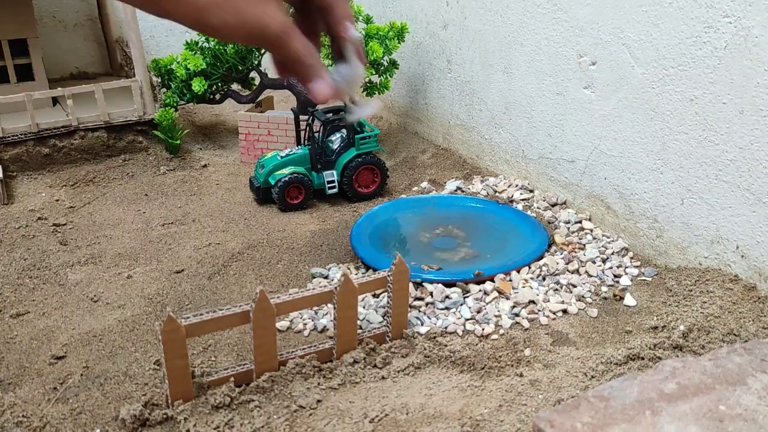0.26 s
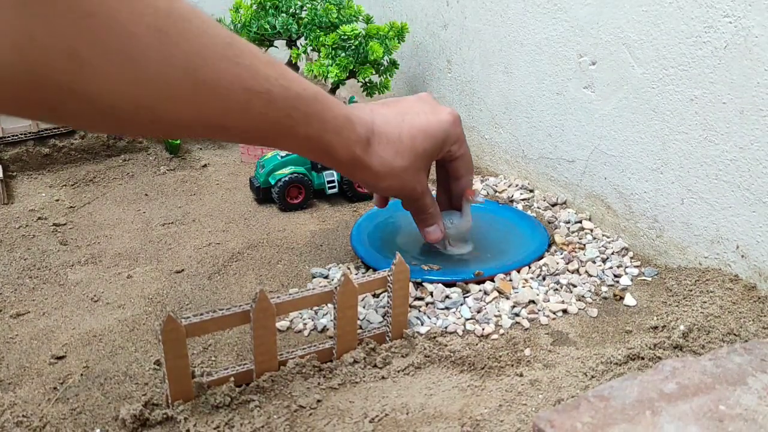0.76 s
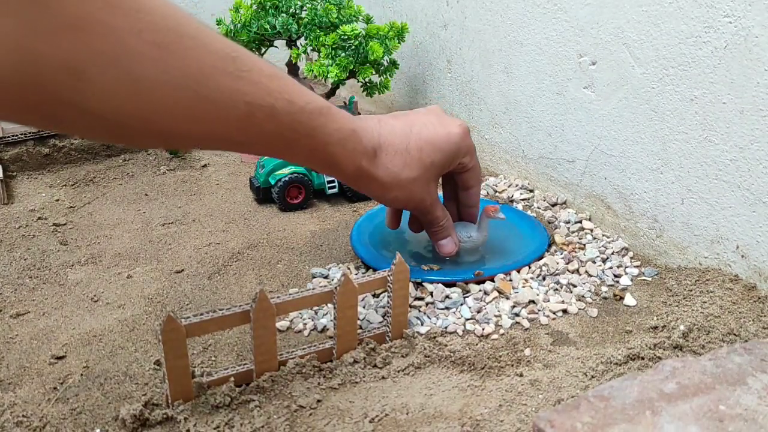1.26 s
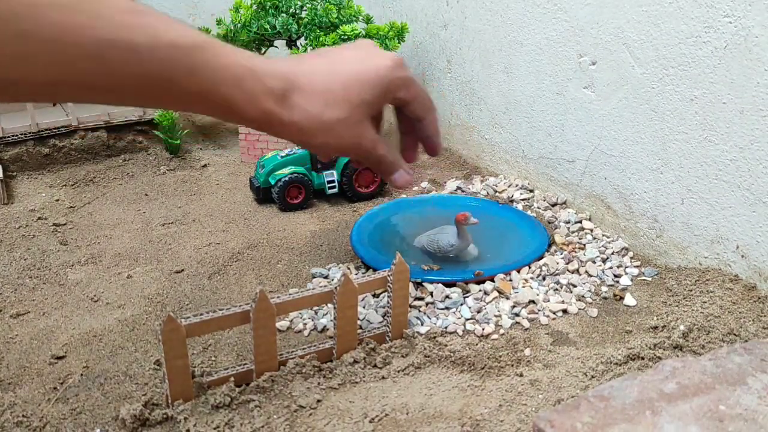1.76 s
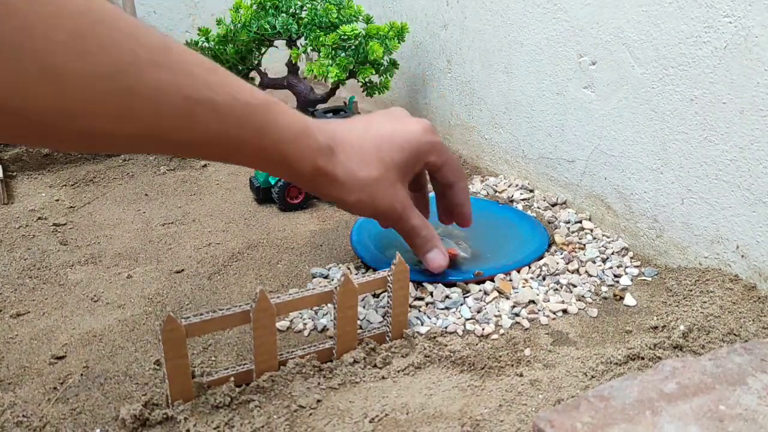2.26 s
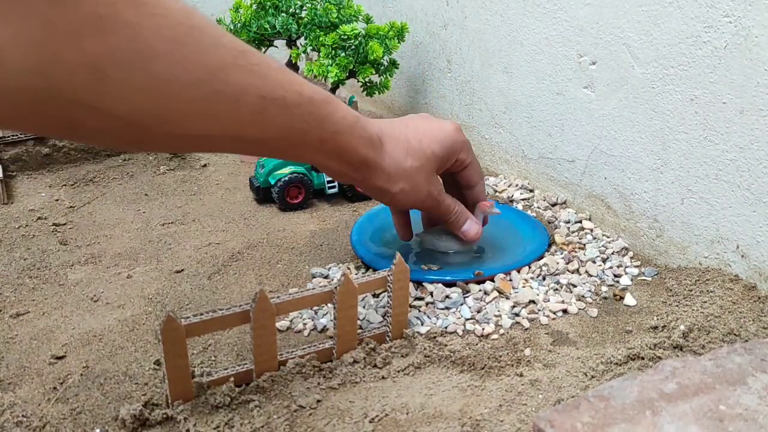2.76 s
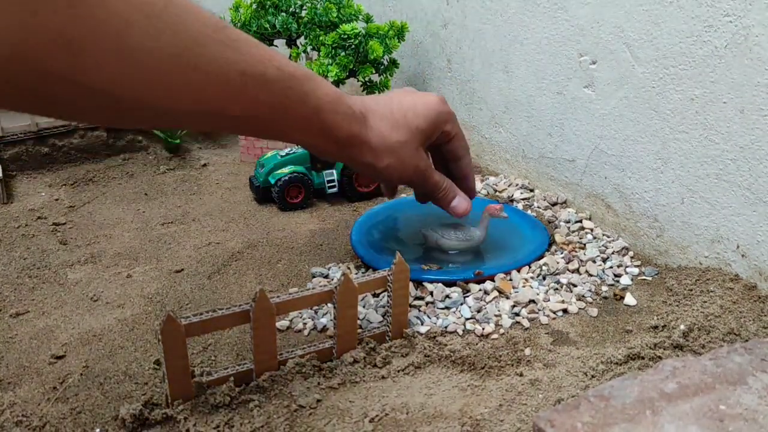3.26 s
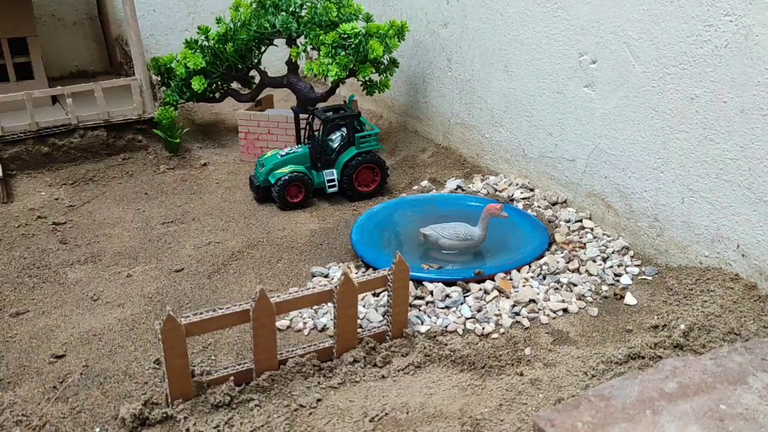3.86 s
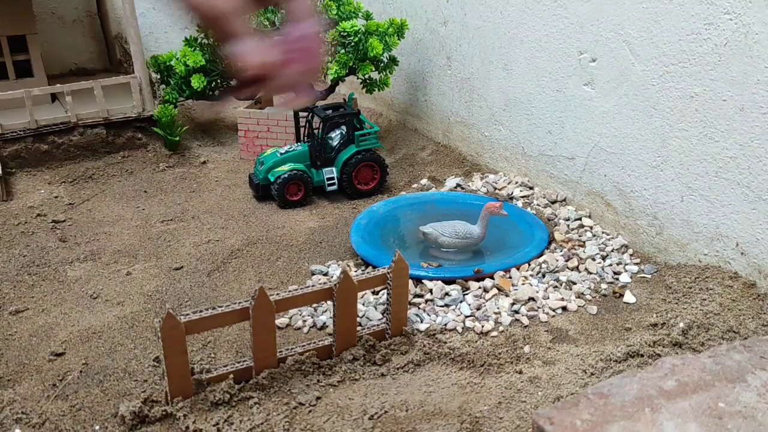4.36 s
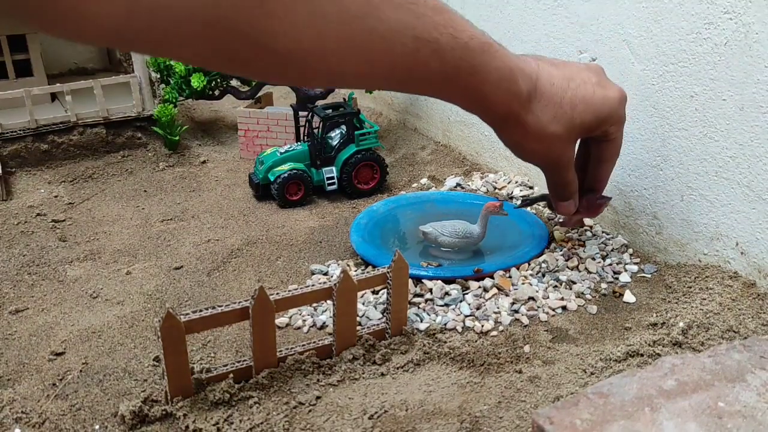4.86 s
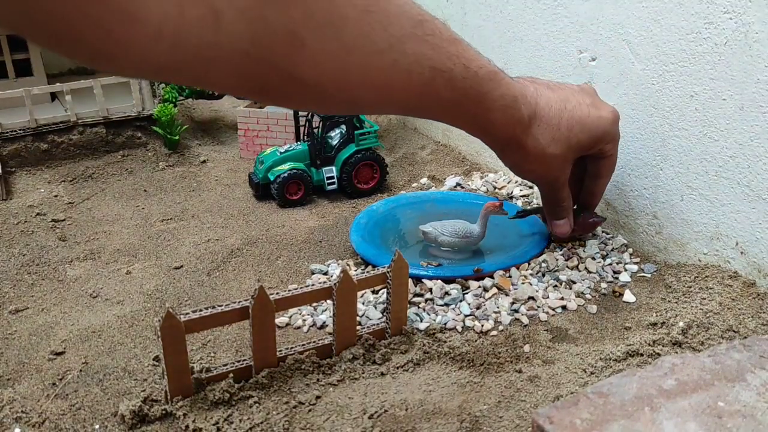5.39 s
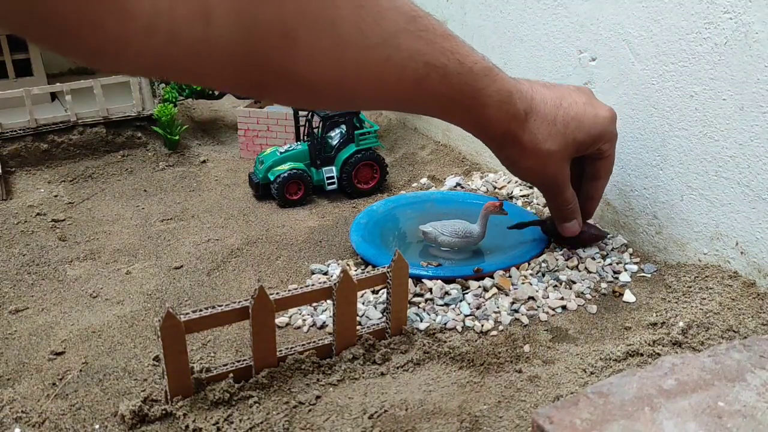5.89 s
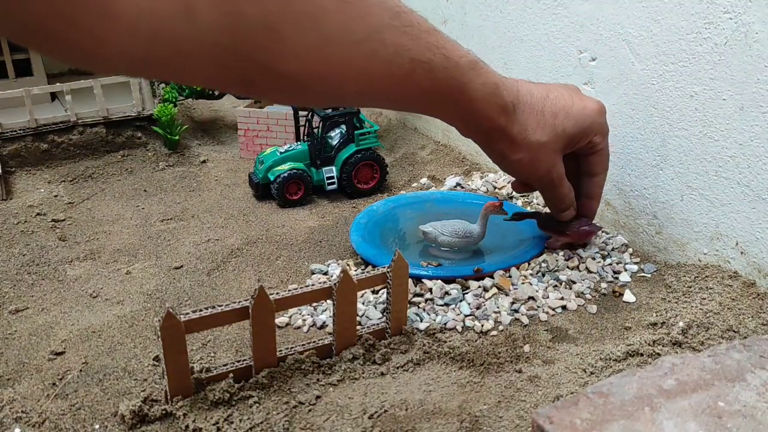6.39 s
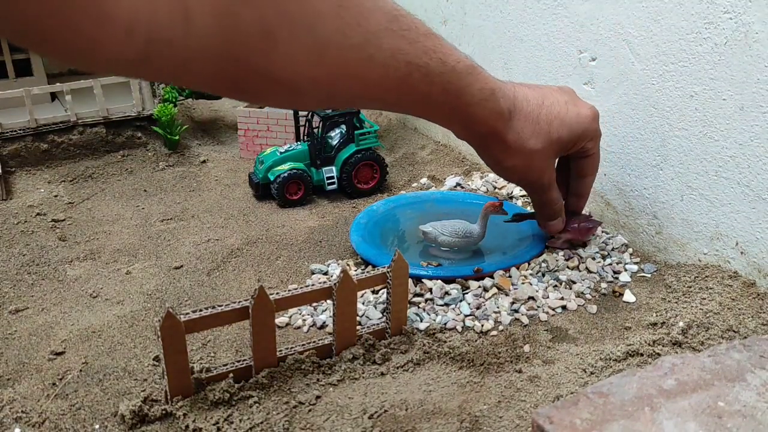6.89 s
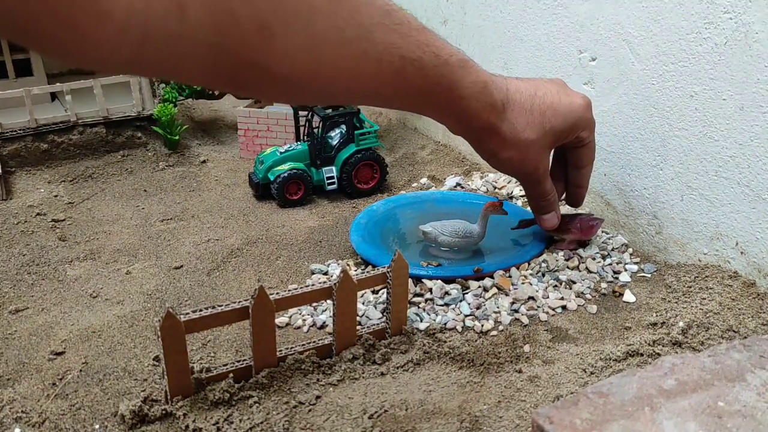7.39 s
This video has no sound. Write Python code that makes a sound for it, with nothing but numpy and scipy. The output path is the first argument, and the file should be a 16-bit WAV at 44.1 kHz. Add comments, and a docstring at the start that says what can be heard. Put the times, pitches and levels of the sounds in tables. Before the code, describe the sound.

Several small birds bicker outdoors in a walled yard. Hoarse, buzzing screeches that sink in pitch mix with lower churrs, brief clean whistles, warbling rasps and a few piercing trills. Calls overlap in clusters with short gaps, some close, others fainter and bounced off the walls. A steady soft hiss lies beneath, with tiny ticks and dull bass bumps. Stereo microphone in the open, a little away from the birds.

```python
"""A walled yard where small birds squabble: hoarse sinking screeches, wide warbling rasps, low churrs, shrill trills.
Each call is a frequency-modulated whistle with band noise for hoarseness and a low voice rattling under it.
Clean whistles and peeps are gliding sines; so are thin squeaks, and ticks are decaying treble noise.
Sparse echoes throw the calls back off the walls. Shaped noise makes a steady outdoor hiss,
narrow bands a faint hum, and short bass bursts a few soft thumps."""
import sys
import numpy as np
from scipy import signal
from scipy.fft import rfft, irfft
from scipy.io import wavfile
from scipy.ndimage import uniform_filter1d, map_coordinates

SR = 44100
rng = np.random.default_rng(int(sys.argv[2]) if len(sys.argv) > 2 else 0)


def transcribe(signal):
    """Save signal, clipped to [-1, 1], as a 16-bit WAV file at the path in sys.argv[1]."""
    frames = np.atleast_2d(signal).T
    limited = np.clip(frames, -1, 1)
    pcm = np.round(limited * 32767).astype(np.int16)
    wavfile.write(sys.argv[1], SR, pcm)


N = 336924

# low voice of trills and rasps: flick height (share of its pitch), flicks per beat, level between flicks (dB)
TWIN_RATTLE = dict(flick_share=.2, flicks=2, rest_db=1)


def gain_of(db):
    """Decibels to gain."""
    return 10 ** (np.asarray(db) / 20)


def evened(x):
    """Scales to rms 1."""
    return x / np.sqrt(np.mean(x ** 2) + 1e-20)


def read(points, hz):
    """Interpolates a (Hz, value) table on a log-frequency axis."""
    f, value = np.transpose(points)
    return np.interp(np.log(hz + 1), np.log(f + 1), value)


def add(mix, start_s, sound):
    """Adds a sound into the mix at start_s, cut at the end of the mix."""
    part = mix[max(round(start_s * SR), 0):][:len(sound)]
    part += sound[:len(part)]


def noise(size, spectrum, tilt_db):
    """Noise of rms 1 with a (Hz, dB) spectrum, tilted by tilt_db an octave above 3 kHz."""
    hz = np.fft.rfftfreq(size, 1 / SR)
    shape_db = read(spectrum, hz) + tilt_db * np.log2(np.maximum(hz / 3000, 1))
    return evened(irfft(rfft(rng.standard_normal(size)) * gain_of(shape_db), size))


def band(size, hz, width_hz):
    """Noise of rms 1 in one bell-shaped band; at 0 Hz, a slow random drift."""
    bell = np.exp(-.5 * ((np.fft.rfftfreq(size, 1 / SR) - hz) / width_hz) ** 2)
    return evened(irfft(rfft(rng.standard_normal(size)) * bell, size))


def glide(hz, envelope):
    """A pure tone along a pitch curve."""
    return np.sqrt(2) * envelope * np.sin(2 * np.pi * np.cumsum(hz) / SR)


def air(level_db=-38.5, patchy_db=1.45):
    """Distant outdoor hiss, partly alike left and right and drifting a little, with a wavering low hum."""
    # Hiss spectrum. Each row: frequency in Hz, relative level in dB per Hz.
    hiss_spectrum = [(15, -64), (25, -54), (48, -20.5), (113, -23.5), (136, -25), (322, -16.5), (359, -17),
                     (399, -13.5), (631, -7.5), (782, -5), (895, -1.5), (1750, -6.5), (3530, -5.5),
                     (8130, -17), (15500, -28)]
    # Stereo likeness of the hiss. Each row: frequency in Hz, left-right correlation.
    hiss_likeness = [(60, 0.96), (130, 0.93), (290, 0.78), (640, 0.7), (1410, 0.64), (3100, 0.19),
                     (6820, -0.099), (15000, 0.2)]
    # Stereo lean of the hiss. Each row: frequency in Hz, left over right in dB.
    hiss_balance = [(60, -9), (110, -3), (200, -6), (380, -2), (700, -3), (1290, -1.0), (2380, -0.5),
                    (4400, 0.5), (8120, 0.5), (15000, -1.5)]
    # Hum bands. Each row: frequency in Hz, starting level in dB before the stereo lean, swell in dB per second.
    hum_bands = [(55.5, -80, 0.5), (110.73, -72.5, 0), (232.6, -79.5, 1.5)]
    frames, hz = N // 512 + 5, np.fft.rfftfreq(2048, 1 / SR)
    a, b, c, d, patches = rng.standard_normal((5, frames, len(hz)))
    patches = uniform_filter1d(uniform_filter1d(patches, size=10, axis=0), size=16, axis=1)
    patches = evened(patches)
    same = read(hiss_likeness, hz)
    left = a + 1j * b
    right = same * left + np.sqrt(1 - same ** 2) * (c + 1j * d)
    lean_db = np.array([.5, -.5])[:, None, None] * read(hiss_balance, hz)
    frame_db = read(hiss_spectrum, hz) + lean_db + patchy_db * patches
    z = np.array([left, right]) * gain_of(frame_db)
    hiss = evened(signal.istft(z.transpose(0, 2, 1), nperseg=2048, noverlap=1536)[1][:, :N])
    t = np.arange(N) / SR
    hum = sum(gain_of(db + swell * t) * band(N, f, 2.7) for f, db, swell in hum_bands)
    return gain_of(level_db) * hiss + hum * gain_of([[1], [-2]])


def whistles(opening_s=.022, direct_db=-7.5, wet_db=-5):
    """Pure tones: two-part whistles, each bent a little differently, and level peeps; direct and reflected."""
    # High arch dropping onto a sinking note, a very short gap, then a lower note that climbs to a flick and falls.
    # Each row: time from the start in seconds, pitch in Hz, relative level in dB.
    tune = [(0, 4250, -8), (.007, 5150, -2), (.016, 5650, -3), (.023, 4450, -1), (.032, 4100, 0),
            (.05, 3850, -7), (.064, 3500, -20), (.075, 3700, -3), (.086, 4250, 5), (.09, 4600, 0),
            (.095, 3750, -3), (.108, 3400, -6)]
    # Two-part whistles. Each row: start in seconds, relative level in dB, extra level of the opening arch in dB.
    whistle_events = [(0.082, -30, -4.5), (.868, -33, 2), (3.951, -29, -13), (6.509, -32.5, 1.5),
                      (7.347, -30, 1)]
    # Peeps. Each row: start in seconds, length in seconds, pitch in Hz, relative level in dB.
    peep_events = [(1.442, 0.02, 4250, -31), (1.923, 0.041, 3795, -35), (3.063, 0.22, 4670, -43),
                   (3.148, 0.016, 3235, -36), (3.972, .025, 3350, -37), (4.098, 0.035, 3410, -33.5),
                   (4.231, .042, 3430, -38), (5.775, 0.037, 4178, -36)]
    out = np.zeros(N)
    at_s, tune_hz, tune_db = np.transpose(tune)
    t = np.arange(0, at_s[-1], 1 / SR)
    size = len(t)
    for start_s, db, opening_db in whistle_events:
        bend = 1 + .008 * band(size, 0, 320) + .012 * band(size, 0, 25)
        hz = np.interp(t, at_s, tune_hz) * bend
        opening = np.exp(-(t / opening_s) ** 6)
        swell_db = np.interp(t, at_s, tune_db) + opening_db * opening + 2.5 * band(size, 0, 110)
        add(out, start_s, glide(hz, gain_of(db + swell_db) * signal.windows.tukey(size, .08)))
    for start_s, length_s, hz, db in peep_events:
        size = int(length_s * SR)
        wavering_hz = hz * (1 + .0044 * band(size, 0, 120))
        add(out, start_s, glide(wavering_hz, gain_of(db) * signal.windows.tukey(size, .7)))
    return out * gain_of([[direct_db], [wet_db]])


def squeaks(length_s=.015, start_hz=13820, fall_share=.13, level_db=-46.5):
    """Very thin falling sine glides, all alike, high in the treble."""
    # Start of each squeak in seconds.
    squeak_starts = [.134, .655, .712, .835, .952]
    out = np.zeros(N)
    age = np.linspace(0, 1, int(length_s * SR))
    for start_s in squeak_starts:
        add(out, start_s, glide(start_hz * (1 - fall_share * age), gain_of(level_db) * np.sin(np.pi * age)))
    return out


def rattle(turns, rest_hz, flick_share, flicks, rest_db, flick_width_beats=.25):
    """The low voice of the syrinx: unsteady at rest, it flicks up to a cleaner note once or twice a beat."""
    cycles = flicks * turns + (flicks - 1) / 2
    off_flick = abs((cycles + .5) % 1 - .5) / (flicks * flick_width_beats)
    flick = np.cos(np.pi / 2 * np.minimum(off_flick, 1)) ** 2
    size = len(turns)
    waver = .048 * (1 - .85 * flick) * band(size, 0, 220) + .02 * band(size, 0, 15)
    return evened(glide(rest_hz * (1 + flick_share * flick + waver), gain_of(rest_db * (1 - flick))))


def call(row, low_voice, dip, half_dip, follow, beat_db, offbeat_db, edge, rasp_rad, rasp_hz, rise_db, fade_db,
         tilt_db, waver_share, fade_power=3.0, onset_sag=.12, taper=.12):
    """A buzzing whistle that arches and sinks, swinging on and between beats, over a rattling low voice.

    dip, half_dip: pitch drop on and between beats (shares; negative lifts); edge: steepness of the drop.
    follow: how far the beat note follows the sinking pitch (share).
    """
    # Hoarse part of the voice. Each row: frequency in Hz, relative level in dB per Hz.
    throat_spectrum = [(1500, -34), (1950, -25), (2400, 2), (3000, -6.5), (3600, -0.5), (4500, 2),
                       (5250, 0), (5850, -6), (6600, -4.5), (7600, -12.5), (9500, -12), (11500, -12),
                       (13000, -27.5), (15000, -61)]
    beat_hz, arch_s = 49.34, .08  # arch_s: start to highest pitch, at most half the call
    overtone_db, overtone_hz = -13, 6200  # level of the octave above a note of overtone_hz
    low_follow, throat_follow = .35, .35  # powers of the whistle's pitch ratio
    length_s, level_db, crest, top_hz, final_hz, hoarse_db, low_hz, low_db = row
    size = int(length_s * SR)
    age = np.linspace(0, 1, size)

    turns = np.cumsum(beat_hz * (1 + .02 * band(size, 0, 25))) / SR
    beat = np.exp(-(abs((turns + .5) % 1 - .5) / .125) ** edge)
    offbeat = np.exp(-(abs(turns % 1 - .5) / .07) ** edge)

    arch = min(arch_s / length_s, .5)
    rising = np.maximum(1 - age / arch, 0)
    sinking = np.maximum(age - arch, 0) / (1 - arch)
    contour = top_hz * (1 - onset_sag * rising ** 2) + (final_hz - top_hz) * sinking ** 1.1
    pitch_ratio = contour / top_hz
    beat_note = top_hz * (1 - dip) + follow * (contour - top_hz)
    strain = gain_of(-7 * sinking)  # the voice relaxes as the pitch sinks
    waver = waver_share * np.sqrt(strain) * band(size, 0, 170)
    pitch = (contour + (beat_note - contour) * beat) * (1 - half_dip * offbeat + waver)

    # a second, irregular vibration shakes the tone between the beats and throws sidebands
    shake = rasp_rad * strain * (1 - beat) * band(size, rasp_hz, 180)
    phase = 2 * np.pi * np.cumsum(pitch) / SR + shake
    overtone = gain_of(overtone_db) * (pitch / overtone_hz) ** 5  # strongest on the highest notes
    tone = np.cos(phase) + overtone * np.cos(2 * phase)
    tone = evened(tone * gain_of(beat_db * beat + offbeat_db * offbeat + .64 * band(size, 0, 170)))

    # hoarseness builds up after the start, dips on and midway between beats, and sinks with the pitch
    throat_at = np.cumsum(pitch_ratio ** throat_follow)
    throat = map_coordinates(noise(size, throat_spectrum, tilt_db), [throat_at], mode="wrap")
    hoarse = evened((1 - .14 * beat - .24 * offbeat) * strain * (1 - .27 * rising ** 2) * throat)
    low = rattle(turns, low_hz * pitch_ratio ** low_follow, **low_voice)

    before = np.maximum(1 - age / crest, 0)
    after = np.maximum((age - crest) / (1 - crest), 0)
    swell_db = -rise_db * before ** 1.88 - fade_db * after ** fade_power
    high = gain_of(swell_db) * evened(tone + gain_of(hoarse_db) * hoarse)
    # the low voice holds its level more evenly than the high one
    voices = high + gain_of(low_db + .31 * swell_db) * low
    return gain_of(level_db) * voices / np.hypot(1, gain_of(low_db)) * signal.windows.tukey(size, taper)


def series(events, far_db, far_spread_db, **voice):
    """Calls of one kind, direct and by the walls: fainter ones are farther off, so more goes by the walls."""
    direct, reflected = np.zeros((2, N))
    for start_s, *row in events:
        level_db = row[1]
        # reflected share of the power: 0.4 at far_db, two thirds at most
        share = 1 / (1.5 + np.exp((level_db - far_db) / far_spread_db))
        sound = call(row, **voice)
        add(direct, start_s, np.sqrt(1 - share) * sound)
        add(reflected, start_s, np.sqrt(share) * sound)
    return np.array([direct, reflected])


def screeches():
    """Hoarse sinking calls whose pitch jumps up, and whose level drops, on and between the beats."""
    # Each row: start in seconds, length in seconds, level at the crest in dB, crest as a share of the length,
    # highest contour pitch in Hz, final contour pitch in Hz, hoarseness in dB,
    # resting pitch of the low voice in Hz, level of the low voice in dB.
    screech_events = [ (.209, 0.32, -24, 0.5, 4158, 3470, -4.5, 2496, -10.5),
                      (.555, 0.3, -35, 0.24, 5120, 4540, 4, 2400, -0.5),
                      (.92, 0.15, -39.5, 0.13, 4235, 3580, 1.5, 2660, -3),
                      (1.29, 0.52, -42, 0.32, 4700, 3714, 3.5, 2560, -6.5),
                      (1.95, 0.29, -30.5, 0.26, 4116, 3630, -2.5, 2480, -14),
                      (2.108, .24, -26, 0.64, 4084, 3126, -7, 2474, -13),
                      (2.31, 0.25, -30.5, 0.15, 4044, 3460, 1, 2400, -5.5),
                      (3.205, .228, -24.5, 0.77, 4190, 3545, -7, 2520, -10.5),
                      (3.63, 0.29, -31, 0.25, 4355, 3330, -1, 2404, -7.5),
                      (5.143, 0.29, -24.5, 0.64, 4260, 3482, -5, 2532, -11.5),
                      (6.525, .3, -27, 0.44, 4364, 2950, -6.5, 2528, -10)]
    return series(
        screech_events, far_db=-31, far_spread_db=5,
        low_voice=dict(flick_share=.33, flicks=1, rest_db=-9),
        dip=-.17, half_dip=-.17, follow=1, beat_db=-15, offbeat_db=-12, edge=2, rasp_rad=.42, rasp_hz=460,
        rise_db=9, fade_db=10.5, tilt_db=.5, waver_share=.032)


def thumps():
    """Dull puffs of deep bass noise, mostly on the right."""
    # Each row: start in seconds, level in dB before the stereo lean, length in seconds.
    thump_events = [(0.299, -41, 0.074), (0.406, -48, 0.14), (0.51, -54, 0.16), (1.945, -53, 0.086),
                    (2.276, -56, 0.04), (2.717, -52, 0.076)]
    out = np.zeros(N)
    for start_s, db, length_s in thump_events:
        size = int(length_s * SR)
        add(out, start_s, gain_of(db) * np.hanning(size) * band(SR, 42.6, 7.1)[:size])
    return out * gain_of([[-12], [2]])


def churrs():
    """Low calls with steep pitch drops, quiet on the beat, and a strong low voice."""
    # Each row: start in seconds, length in seconds, level at the crest in dB, crest as a share of the length,
    # highest contour pitch in Hz, final contour pitch in Hz, hoarseness in dB,
    # resting pitch of the low voice in Hz, level of the low voice in dB.
    churr_events = [ (.44, 0.13, -33, 0.33, 3100, 2710, -5, 2250, -8),
                    (.616, .23, -32.5, 0.13, 3595, 2913, -5, 2380, -0.5),
                    (1.72, 0.25, -43.5, 0.29, 3105, 2550, 13, 2390, -2),
                    (2.25, 0.19, -33.5, .45, 3200, 2810, 5, 2263, -8),
                    (2.42, 0.4, -35, 0.51, 3315, 2720, 5, 2430, -10),
                    (3.51, .2, -29.5, 0.53, 3670, 3310, -4, 2423, -1),
                    (3.72, 0.21, -37.5, 0.83, 3316, 2740, -7, 2307, -7),
                    (4.912, 0.3, -35.5, 0.39, 3560, 2885, -6, 2493, 1),
                    (5.475, .185, -30.5, 0.4, 3746, 3480, -12, 2490, 1.5),
                    (5.65, 0.1, -42, .45, 3275, 3000, -13, 2420, 0),
                    (6.74, 0.15, -36.5, 0.32, 2945, 2420, -16, 2144, -3),
                    (6.88, 0.23, -36, 0.73, 2890, 2473, -1, 2190, -1),
                    (7.26, 0.16, -38.5, .5, 3300, 2800, 5, 2405, -2)]
    return series(
        churr_events, far_db=-37, far_spread_db=2.2,
        low_voice=dict(flick_share=.34, flicks=1, rest_db=-11),
        dip=.16, half_dip=.28, follow=.25, beat_db=-9, offbeat_db=1, edge=4, rasp_rad=.5, rasp_hz=586,
        rise_db=13, fade_db=10.5, tilt_db=-8, waver_share=.0504, taper=.23)


def ticks():
    """Tiny dry bursts of treble noise that die away exponentially."""
    # Each row: start in seconds, level in dB before the stereo lean, decay time constant in seconds.
    tick_events = [(.81, -44, 0.056), (.928, -44, .03), (1.05, -45, 0.039), (1.18, -46, 0.036),
                   (5.059, -39, 0.0016), (5.206, -30, 0.0023), (5.81, -49.5, .033), (6.971, -42.5, .025)]
    out = np.zeros(N)
    for start_s, db, decay_s in tick_events:
        t = np.arange(int(4 * decay_s * SR)) / SR
        add(out, start_s, gain_of(db) * np.exp(-t / decay_s) * band(len(t), 9600, 1800))
    return out


def trills():
    """Shrill high calls, louder and lower on and between the beats."""
    # Each row: start in seconds, length in seconds, level at the crest in dB, crest as a share of the length,
    # highest contour pitch in Hz, final contour pitch in Hz, hoarseness in dB,
    # resting pitch of the low voice in Hz, level of the low voice in dB.
    trill_events = [ (2.594, 0.22, -27.5, 0.33, 5670, 4170, -9, 2640, -10),
                    (4.351, .18, -21, 0.37, 6330, 4790, -7.5, 2815, -12.5),
                    (7.089, 0.26, -26, 0.4, 5780, 3910, -7, 2754, -14)]
    return series(
        trill_events, far_db=-31, far_spread_db=3.5, low_voice=TWIN_RATTLE,
        dip=.2, half_dip=.15, follow=.85, beat_db=8, offbeat_db=4.5, edge=2, rasp_rad=.25, rasp_hz=810,
        rise_db=13, fade_db=14, fade_power=1.26, tilt_db=6.5, waver_share=.0405, taper=.22)


def rasps():
    """Wide warbling calls, roughened by a deep irregular phase shake."""
    # Each row: start in seconds, length in seconds, level at the crest in dB, crest as a share of the length,
    # highest contour pitch in Hz, final contour pitch in Hz, hoarseness in dB,
    # resting pitch of the low voice in Hz, level of the low voice in dB.
    rasp_events = [ (4.19, 0.22, -35, 0.48, 5010, 4220, -19, 2574, -11),
                   (4.59, 0.26, -28, 0.574, 4465, 3440, -10, 2550, -18),
                   (6.11, 0.341, -42, 0.45, 4025, 2703, -29, 2510, -8),
                   (7.44, 0.21, -30, 0.66, 4283, 3400, -12, 2550, -17)]
    return series(
        rasp_events, far_db=-29.5, far_spread_db=4.5, low_voice=TWIN_RATTLE,
        dip=.15, half_dip=.16, follow=.9, beat_db=2, offbeat_db=2, edge=2, rasp_rad=.55, rasp_hz=490,
        rise_db=6, fade_db=7, tilt_db=6, waver_share=.0503)


def yard(direct, reflected, early_db=-2, tail_db=-5, early_s=.0048, likeness=.42):
    """Direct sound, quick echoes off ground and walls, and a short diffuse tail, at two microphone ports."""
    # Tail decay. Each row: frequency in Hz, time to fall 60 dB in seconds.
    yard_decay = [(500, 0.2), (3000, 0.71), (6000, 0.52), (12000, 0.31)]
    # Phase between the ports. Each row: frequency in Hz, lead of the right in radians.
    port_phase = [(100, 0.5), (3000, 0.02), (4600, 0.31), (6000, 0.94), (8500, 1.62), (12000, 2.05),
                  (15000, 1.4)]
    size = SR // 2
    t = np.arange(size) / SR
    hits = rng.random((3, size)) < 2500 / SR  # 2500 echoes per second
    taps = rng.standard_normal((3, size)) * hits * (t > .001)
    taps = np.sqrt(likeness) * taps[2] + np.sqrt(1 - likeness) * taps[:2]
    early = taps * np.exp(-t / early_s)
    hz, at_s, z = signal.stft(taps * (1 - np.exp(-t / .02)), SR, nperseg=256)
    decay = gain_of(-60 * at_s / read(yard_decay, hz)[:, None])
    tail = signal.istft(z * decay, SR, nperseg=256)[1][:, :size]
    echoes = (gain_of(early_db) * evened(early) + gain_of(tail_db) * evened(tail)) / np.sqrt(size)
    heard = direct + signal.fftconvolve(reflected[None], echoes, axes=1)[:, :N]
    lead = read(port_phase, np.fft.rfftfreq(N, 1 / SR))
    return irfft(rfft(heard) * np.exp(1j * np.array([[-.5], [.5]]) * lead), N)


def scene():
    """Near and far birds in the yard, over the outdoor air."""
    birds = yard(*(screeches() + rasps() + churrs() + whistles())) * gain_of([[-.6], [.7]])
    birds += yard(*trills()) * gain_of([[.4], [-.4]])
    specks = (squeaks() + ticks()) * gain_of([[1], [-9]])  # mostly on the left
    return birds + specks + air() + thumps()


def record(dry, edge_hz=15250):
    """The recorder's band limit: a linear-phase low-pass."""
    lowpass = signal.firwin(511, edge_hz, window=("kaiser", 9), fs=SR)
    return signal.oaconvolve(dry, lowpass[None], "same")


dry = scene()
out = record(dry)
transcribe(out)
```